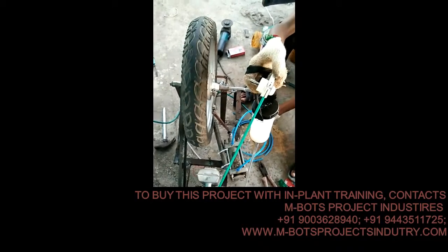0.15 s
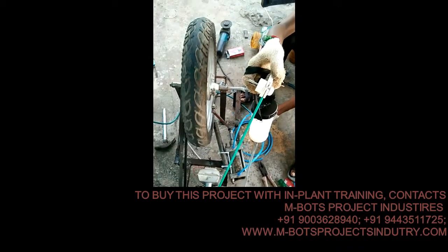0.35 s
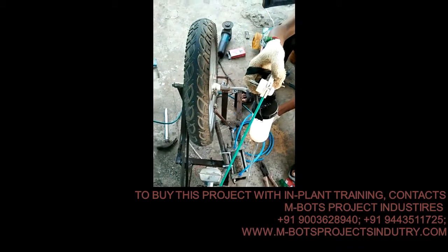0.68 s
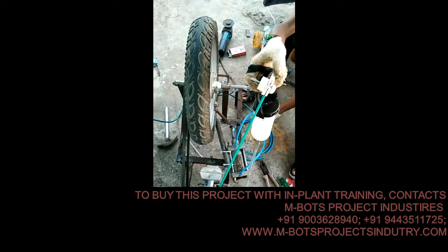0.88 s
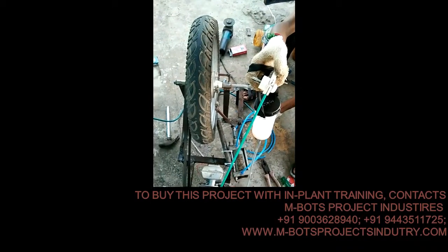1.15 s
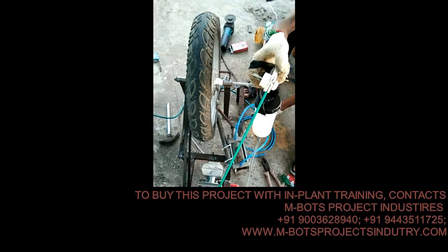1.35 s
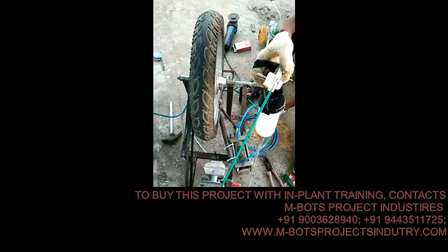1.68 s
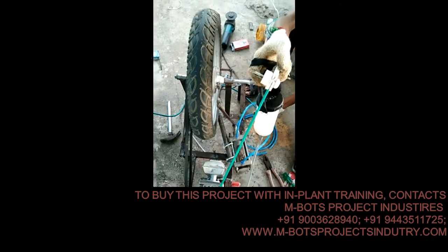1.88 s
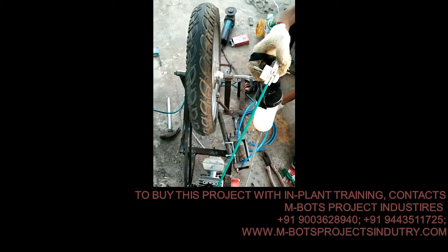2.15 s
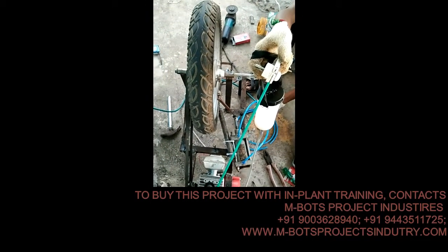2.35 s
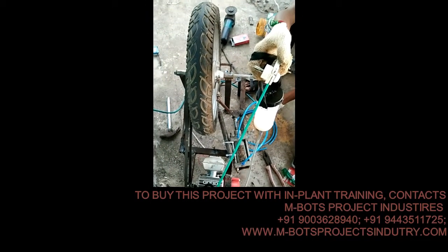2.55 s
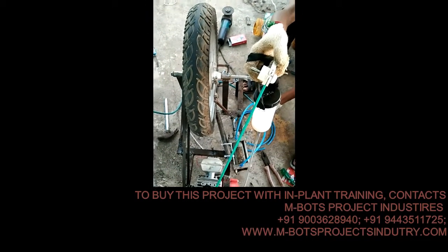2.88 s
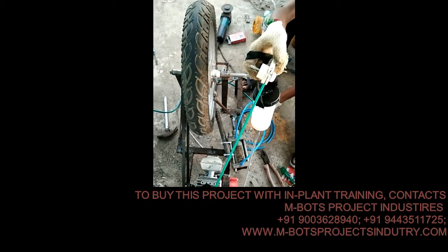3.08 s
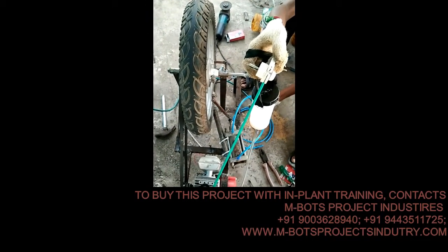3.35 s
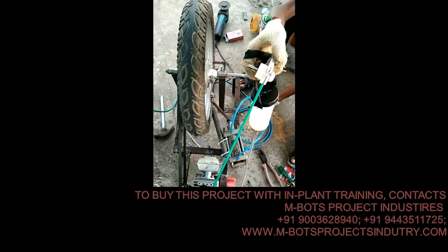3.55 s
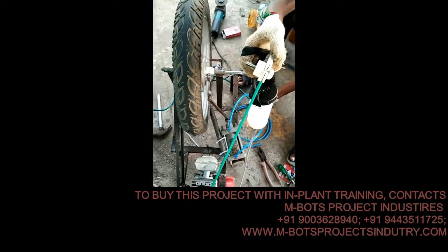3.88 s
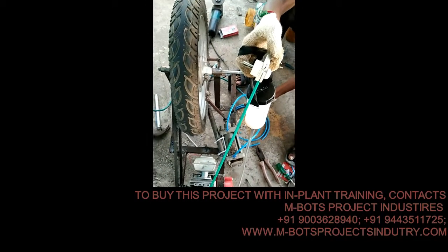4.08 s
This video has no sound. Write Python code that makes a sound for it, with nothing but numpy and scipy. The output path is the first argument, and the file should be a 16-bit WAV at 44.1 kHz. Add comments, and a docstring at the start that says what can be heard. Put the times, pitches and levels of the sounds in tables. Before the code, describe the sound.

A lever valve pops and blasts bright air four times, dull clacks between, a faint leak and low machine hum behind.

```python
"""Lever valve blasts on a workshop rig

A hand works a pneumatic lever valve back and forth, four strokes over a humming workshop with a far-off rasp.
At each stroke shaped noise seeps past the spool, a low pulse pops and a bright noise blast empties the cylinder.
The piston knocks the rig with short bursts of resonant noise, and soft low bumps swing the frame.
In one lever position the valve keeps leaking, a thin steady hiss. Both channels are alike."""
import sys
import numpy as np
from scipy import signal
from scipy.fft import rfft, irfft, next_fast_len
from scipy.io import wavfile
from scipy.ndimage import map_coordinates

SR = 44100
rng = np.random.default_rng(int(sys.argv[2]) if len(sys.argv) > 2 else 0)


def master_out(mix):
    """Clip the mix to full scale and print it as 16-bit PCM to the path in sys.argv[1]."""
    frames = np.transpose(np.atleast_2d(mix))
    ceiling = np.clip(frames, -1, 1)
    pcm = np.round(ceiling * 32767).astype(np.int16)
    wavfile.write(sys.argv[1], SR, pcm)


N = 185661  # samples, about 4.2 s


def amp(db):
    """Decibels to gain."""
    return 10 ** (np.asarray(db) / 20)


def unit(x):
    """The signal scaled to rms 1."""
    return x / np.sqrt(np.mean(x ** 2) + 1e-20)


def clock():
    """The time of every sample, in seconds."""
    return np.arange(N) / SR


def along(points, hz):
    """Reads a curve of (frequency [Hz], value) points on a log frequency axis."""
    point_hz, values = np.transpose(points)
    return np.interp(np.log(hz + 1), np.log(point_hz + 1), values)


def bell(f, hz, width):
    """A resonance peak of height 1; width in Hz at half height."""
    return 1 / (1 + (2 * (f - hz) / width) ** 2)


def wobble(rate):
    """A smooth random curve, rate knots a second."""
    knots = rng.standard_normal(int(N * rate / SR) + 4)
    return map_coordinates(knots, [clock() * rate])


def filtered(x, response):
    """Shapes the spectrum of x with a gain that is a function of frequency."""
    size = next_fast_len(N + SR // 2)
    gain = response(np.fft.rfftfreq(size, 1 / SR))
    return irfft(rfft(x, size) * gain, size)[..., :N]


def noise(response):
    """Coloured noise of rms 1."""
    return unit(filtered(rng.standard_normal(N), response))


def gate(start, end, rise, t60):
    """Opens over the rise, holds until the end, then falls 60 dB per t60; all in seconds."""
    t = clock()
    opening = np.clip((t - start) / rise, 0, 1)
    return opening * amp(-60 * np.maximum(t - end, 0) / t60)


# decay of the workshop's reverberant tail: (frequency [Hz], t60 [s])
ROOM_DECAY = [(200, 1), (2000, 0.59), (7000, 0.45), (10000, 0.44), (15000, 0.36)]


def room(x, near_db=-6, near_t60=0.033, wet_db=-10):
    """The rig and floor scatter the sound almost at once; the walls add a longer tail."""
    t = np.arange(SR // 2) / SR
    near = rng.standard_normal(len(t)) * amp(-60 * t / near_t60)
    # each frequency of the tail dies at its own pace
    hz, frames, grains = signal.stft(rng.standard_normal(len(t)), SR, nperseg=256)
    fade = amp(-60 * frames / along(ROOM_DECAY, hz)[:, None])
    tail = signal.istft(grains * fade, SR, nperseg=256)[1][:len(t)]
    response = amp(near_db) * near / np.linalg.norm(near) + amp(wet_db) * tail / np.linalg.norm(tail)
    response[t < .002] = 0  # the first reflection takes a moment to arrive
    response[0] = 1  # direct sound
    return signal.fftconvolve(x, response / np.linalg.norm(response))[:N]


# colour of the steady shop noise: (frequency [Hz], relative density [dB per Hz])
SHOP_COLOUR = [(60, -4), (200, -4.5), (400, -2.5), (650, -5.5), (850, -13.5), (1400, -13), (2600, -14),
               (4000, -18.5), (5300, -19.0), (6600, -13.5), (9700, -15), (11200, -22.5), (13000, -25),
               (15200, -32)]
# steady machine tones: (frequency [Hz], level [dB])
HUM_TONES = [(349.9, -57.5), (425.3, -63), (489.9, -62.5)]
# the machine's highest tone, slightly fuzzy, swells and fades slowly
WHINE_HZ, WHINE_WIDTH_HZ, WHINE_DB = 993, 21, -60
WHINE_PEAK_S, WHINE_PERIOD_S, WHINE_SWELL_DB = 0.89, 1.87, 3.5


def workshop(air_db=-45, drift_hz=3, waver_db=2):
    """Steady shop noise under machine tones that waver in pitch and level, and a slowly swelling whine."""
    air = amp(air_db) * noise(lambda f: amp(along(SHOP_COLOUR, f)))
    hum = np.zeros(N)
    for hz, db in HUM_TONES:
        level = amp(db + waver_db * (wobble(2.98) + wobble(17)))
        phase = 2 * np.pi * np.cumsum(hz + drift_hz * wobble(14)) / SR
        hum += np.sqrt(2) * level * np.sin(phase)  # root 2 makes the level an rms
    swell_db = WHINE_SWELL_DB * np.cos(2 * np.pi * (clock() - WHINE_PEAK_S) / WHINE_PERIOD_S)
    whine = amp(WHINE_DB + swell_db) * noise(lambda f: bell(f, WHINE_HZ, WHINE_WIDTH_HZ))
    return air + hum + whine


# the rasp repeats evenly: middle of the first, spacing, length
RASP_FIRST_S, RASP_EVERY_S, RASP_S = 1.875, 0.607, 0.35
RASP_DB, RASP_HZ, RASP_SAG_HZ_PER_S = -49.5, 1594, 352


def rasps(width_hz=400, edge_hz=170, count=3):
    """Soft far-off swells of narrow, rough noise, each sliding down a little in pitch."""
    out = np.zeros(N)
    for k in range(count):
        t = clock() - RASP_FIRST_S - k * RASP_EVERY_S
        # a resonant band, cut off sharply just above its centre
        band = signal.hilbert(noise(lambda f: bell(f, RASP_HZ, width_hz) * (f < RASP_HZ + edge_hz)))
        sagging = np.real(band * np.exp(-1j * np.pi * RASP_SAG_HZ_PER_S * t ** 2))
        swell = np.cos(np.pi * np.clip(t / RASP_S, -.5, .5))
        out += amp(RASP_DB) * swell * sagging
    return out


# low bumps of the rig's frame: (time [s], level [dB], pitch [Hz])
FRAME_BUMPS = [(0.646, -34.5, 120), (0.826, -33.5, 99), (0.938, -41, 88), (1.218, -35, 107),
               (1.983, -30.5, 174), (3.267, -30, 116), (3.291, -35, 105), (3.704, -34, 98),
               (3.928, -34, 90)]
BUMP_T60 = 0.16  # s


def bumps(attack=0.0071, swing_db=-9, rattle_db=-5.5):
    """Each soft blow swings the frame for a few cycles, with a dull rattle."""
    out = np.zeros(N)
    for start, db, hz in FRAME_BUMPS:
        swing = amp(swing_db) * np.sin(2 * np.pi * hz * (clock() - start))
        rattle = amp(rattle_db) * noise(lambda f: bell(f, hz, width=0.62 * hz))
        out += amp(db) * (swing + rattle) * gate(start, start + attack, attack, BUMP_T60)
    return out


# knocks and clacks of the piston during and at the end of its travel, one or two per stroke:
# (time [s], knock level [dB], clack level [dB], knock t60 [s])
PISTON_KNOCKS = [(0.418, -32, -45, 0.21), (1.355, -36.5, -37.5, 0.34), (1.41, -31.5, -30, 0.15),
                 (1.973, -29, -27, 0.26), (2.053, -31, -37.5, 0.15), (3.434, -33.5, -28.5, 0.17),
                 (3.498, -30, -26.5, 0.17)]
# low resonances of the rig: (frequency [Hz], width [Hz], relative level [dB])
FRAME_MODES = [(312, 127, 3), (402, 81, 2.5), (716, 210, -1.5)]
# resonances of the cylinder: (frequency [Hz], width [Hz], relative level [dB])
BARREL_MODES = [(880, 900, -0.5), (1450, 150, -8.5), (1880, 370, 5.5), (2470, 170, 4)]


def ringing(modes, dull_hz):
    """Noise shaped by a set of resonances, with nothing above dull_hz."""
    def response(f):
        return sum(amp(db) * bell(f, hz, width) for hz, width, db in modes) * (f < dull_hz)
    return noise(response)


def piston(dull_hz=2700, clack_share=0.9, impact_db=-6, impact_t60=0.012):
    """The piston knocks the rig and clacks in the barrel, the clack hardest at first contact."""
    out = np.zeros(N)
    for start, knock_db, clack_db, t60 in PISTON_KNOCKS:
        knock = amp(knock_db) * ringing(FRAME_MODES, dull_hz) * gate(start, start, 0.00068, t60)
        clack_fade = gate(start, start, 0.0003, clack_share * t60)
        clack = amp(clack_db) * ringing(BARREL_MODES, dull_hz) * clack_fade
        contact = 1 + amp(impact_db) * gate(start, start, 0.0003, impact_t60)
        out += knock + clack * contact
    return out


# the seal leaks while the lever is over:
# (start [s], end [s], level [dB], whistle band [Hz], whistle lift [dB])
SEAL_LEAKS = [(-.1, .296, -33.5, 7220, 8), (1.403, 1.912, -35.5, 6770, 8.5), (3.486, 4.3, -35, 7280, 10)]
# colour of the leaking air: (frequency [Hz], relative density [dB per Hz])
LEAK_SPECTRUM = [(400, -26), (1400, -9.5), (2200, -8.5), (3200, -4), (3700, -6.5), (4500, -7), (5300, -9.5),
                 (6200, -1.5), (8000, -2.5), (9000, -0.5), (10900, -7.5), (12000, -4.5), (14300, -12.5),
                 (15500, -7.5)]


def leaks(waver_db=0.25, width_hz=900):
    """A thin, steady jet through the seal, with a band where the gap nearly whistles."""
    out = np.zeros(N)
    for start, end, db, hz, lift in SEAL_LEAKS:
        jet = noise(lambda f: amp(along(LEAK_SPECTRUM, f) + lift * bell(f, hz, width_hz)))
        level = amp(db + waver_db * wobble(6.4))
        out += jet * level * gate(start, end, rise=.001, t60=0.025)
    return out


# lever strokes: (port opens [s], choked flow lasts [s], port [0 or 1], whistle band [Hz],
#                 whistle lift [dB], seep level [dB], opening pop level [dB])
LEVER_STROKES = [(0.2967, 0.11, 0, 7500, 1, -19.5, -25), (1.1929, 0.16, 1, 7350, 0, -33.5, -27),
                 (1.909, 0.12, 0, 8100, 4, -26, -22.5), (3.2695, 0.170, 1, 7140, 1.5, -33, -30.5)]
# the two lever directions, port 0 then port 1: (emptying t60 [s], seep lead [s])
PORT_TIMING = [(0.18, 0.0059), (0.13, 0.028)]


def strokes():
    """Each stroke with the settings of its lever direction."""
    return [(row, PORT_TIMING[int(row[2] > .5)]) for row in LEVER_STROKES]


# colour of the seeping air: (frequency [Hz], relative density [dB per Hz])
SEEP_SPECTRUM = [(1000, -6), (3500, -8), (6500, 0), (10000, 0), (13000, 0.5), (15500, -7)]
SEEP_WHISTLE_HZ, SEEP_LIFT_DB = 7600, 4.5  # the band where the narrow gap nearly whistles
SEEP_GROWS_DB = 8  # extra rise of the seep's midrange as it fades in with the widening gap


def seeps(width_hz=1100, fizz_hz=12200, fizz_db=5, body_hz=5500, body_width_hz=6000, body_db=-11):
    """Air slips past the moving spool just before a port opens: thin at first, fuller as the gap widens."""
    def colour(f):
        whistle = SEEP_LIFT_DB * bell(f, SEEP_WHISTLE_HZ, width_hz)
        fizz = fizz_db * bell(f, fizz_hz, width_hz)
        return amp(along(SEEP_SPECTRUM, f) + whistle + fizz)

    out = np.zeros(N)
    for (start, *_, db, _), (_, lead) in strokes():
        gap = np.clip((clock() - start) / lead + 1, 0, 1)
        midrange = noise(lambda f: bell(f, body_hz, body_width_hz))
        body = gap * amp(body_db + SEEP_GROWS_DB * gap) * midrange
        out += amp(db) * (noise(colour) + body) * gate(start - lead, start, rise=0.00059, t60=0.036)
    return out


POP_HZ, POP_S = 240, 0.0033  # pitch and half length of the pressure pulse at the opening


def pops(puff_db=-7, puff_width_hz=520, puff_t60=0.051):
    """The sudden release of pressure kicks the valve for about two low cycles, with a dull puff."""
    out = np.zeros(N)
    for (start, *_, db), _ in strokes():
        t = clock() - start
        kick = np.exp(-(t / POP_S) ** 2) * np.sin(2 * np.pi * (POP_HZ * t + rng.random()))
        dull = noise(lambda f: bell(f, POP_HZ, puff_width_hz))
        puff = dull * gate(start - POP_S, start + POP_S, POP_S, puff_t60)
        out += amp(db) * (kick + amp(puff_db) * puff)
    return out


# noise of each exhaust port: (frequency [Hz], relative density [dB per Hz])
PORT_0_COLOUR = [(100, -24.5), (500, -21), (1080, -24.5), (1450, -17), (1950, -16.5), (2900, -12.5),
                 (3500, -12), (4800, -8), (5800, -6.5), (6600, 0.5), (7500, -1.5), (10000, -7.5),
                 (11500, -14), (15200, -21)]
PORT_1_COLOUR = [(100, -29.5), (400, -20.5), (1020, -21.5), (1500, -12.5), (2000, -8.5), (3500, -8.5),
                 (4400, -5), (5900, -5), (6600, 2), (7400, 1.5), (8700, -3.5), (10100, -4), (13000, -17),
                 (15200, -20.5)]
# resonances of the valve body: (frequency [Hz], width [Hz], lift [dB])
BODY_RESONANCES = [(1390, 200, 3), (3040, 190, 0.5), (5540, 250, 0.5), (6130, 300, 0.5), (10000, 380, 1.5)]
BLAST_DB, OPEN_S = -12.5, 0.002  # level of the choked jet; time a port takes to open


def blasts(whistle_width_hz=600, spit_db=-15, spit_t60=0.57):
    """The choked jet roars evenly, then fades as the cylinder runs empty."""
    out = np.zeros(N)
    for (start, length, port, whistle_hz, whistle_db, *_), (t60, _) in strokes():
        colour = PORT_1_COLOUR if port > .5 else PORT_0_COLOUR
        peaks = list(BODY_RESONANCES) + [(whistle_hz, whistle_width_hz, whistle_db)]

        def response(f):
            lifts = sum(lift * bell(f, hz, width) for hz, width, lift in peaks)
            return amp(along(colour, f) + lifts)

        jet = noise(response)
        # full pressure at the opening adds a bright spit, which fades on top of the blast's own envelope
        hiss = noise(lambda f: bell(f, hz=13100, width=2900))
        spit = amp(spit_db) * hiss * gate(start, start, .001, spit_t60)
        flow = gate(start, start + length, OPEN_S, t60)
        out += room((jet + spit) * amp(BLAST_DB) * flow)
    return out


def scene():
    """Valve and rig close by in the workshop, alike in both channels."""
    background = workshop() + rasps()
    rig = bumps() + pops()
    mono = background + rig + room(piston() + leaks() + seeps()) + blasts()
    return np.array([mono, mono])


TOP_HZ = 15600  # band limit


def record(dry, low_hz=48):
    """The microphone chain cuts the deep bass, rounds the highest peaks and passes nothing above its limit."""
    lean = signal.sosfilt(signal.butter(4, low_hz, "high", fs=SR, output="sos"), dry)
    rounded = lean / (1 + np.abs(lean / .8) ** 6) ** (1 / 6)
    return filtered(rounded, lambda f: f < TOP_HZ)


dry = scene()
out = record(dry)
master_out(out)
```